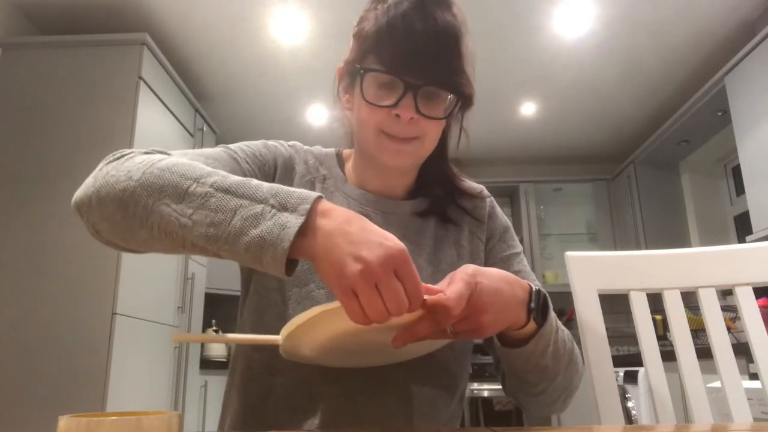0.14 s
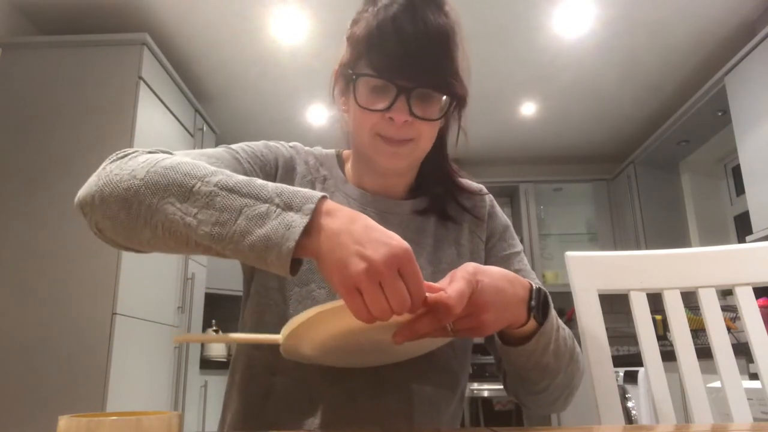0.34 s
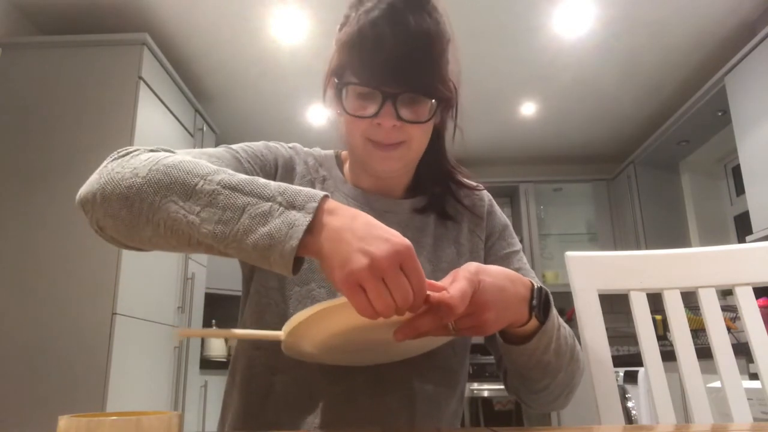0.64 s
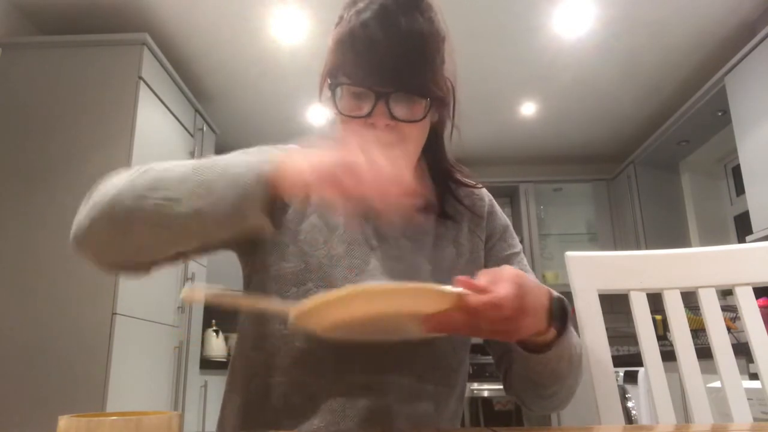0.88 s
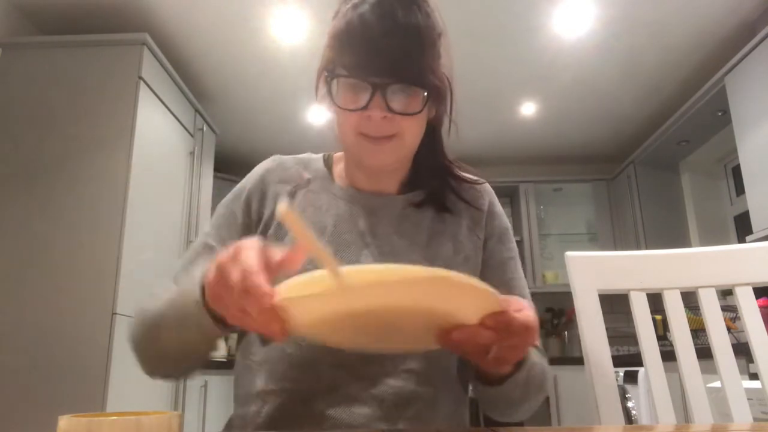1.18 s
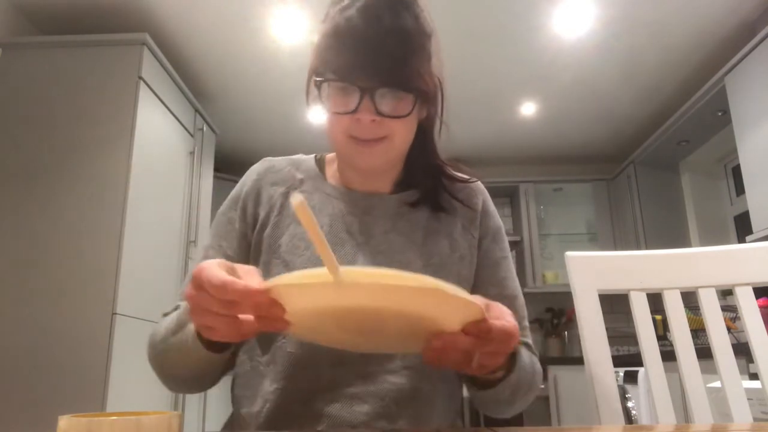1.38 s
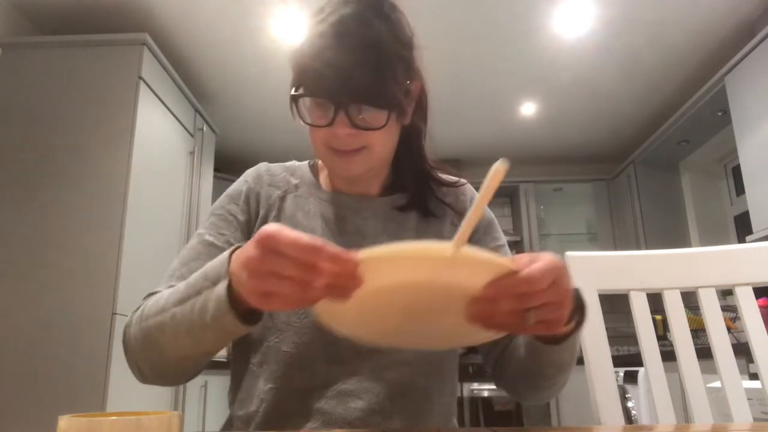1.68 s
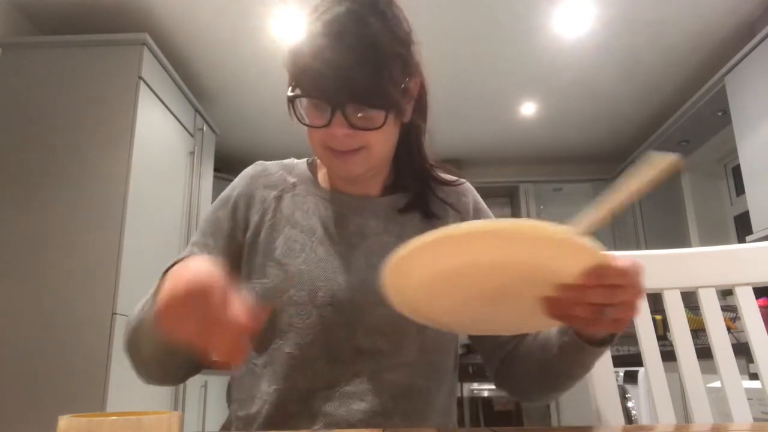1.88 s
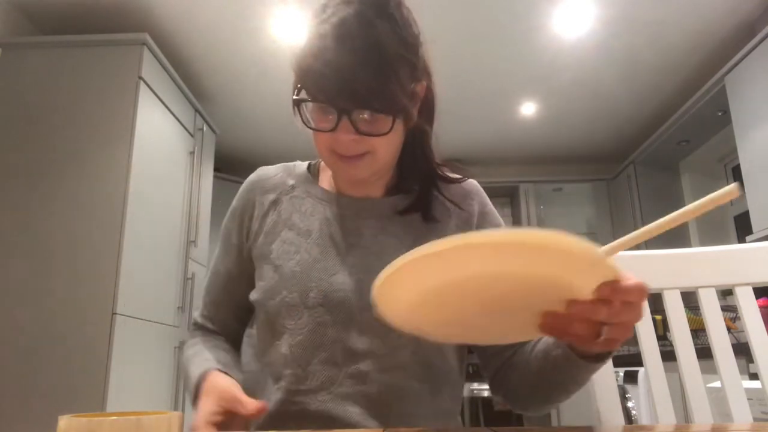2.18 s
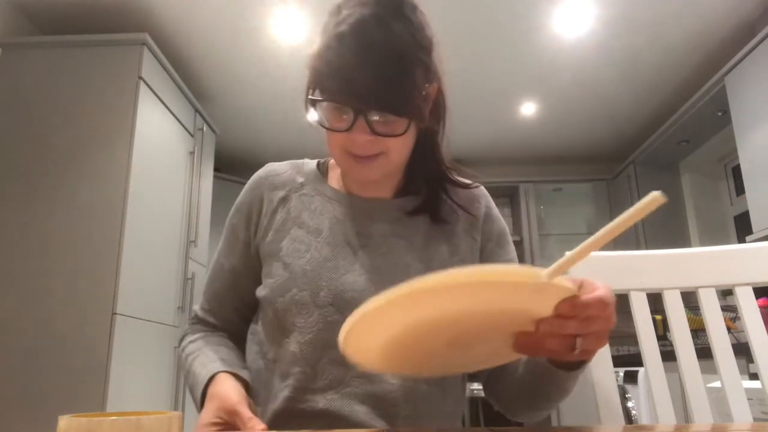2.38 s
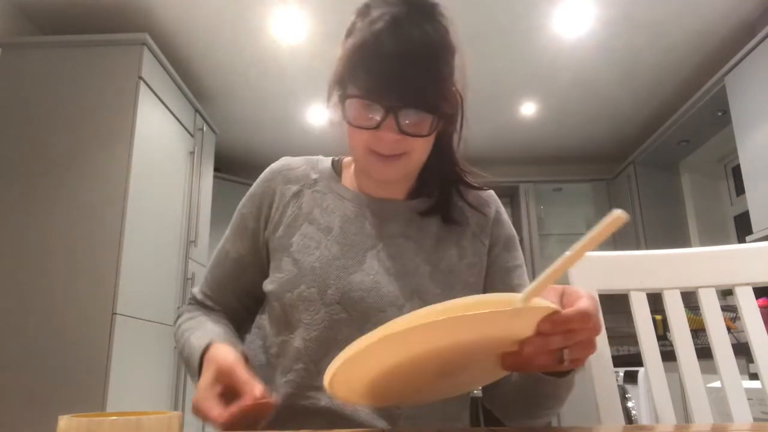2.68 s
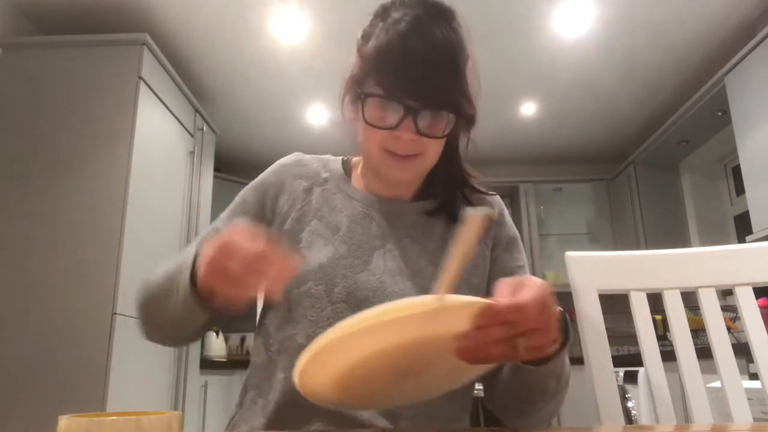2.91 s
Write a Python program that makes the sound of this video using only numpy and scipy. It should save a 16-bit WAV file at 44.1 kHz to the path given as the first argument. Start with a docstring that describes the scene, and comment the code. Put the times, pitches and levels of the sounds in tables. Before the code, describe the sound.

A paper plate clicks and buckles as fingers press tape onto it, then rub round the rim with one short squeak. After a lull, sticky tape rips off in a quick burst, close up in an echoing kitchen.

```python
"""Taping a paper plate

A paper plate with a stick taped to it is handled close up at a kitchen table. Fingers press tape on,
so the card clicks, buckles and bumps, then slide round the rim with one short squeak. A strip of
sticky tape rips off in one quick run of snaps. The hard kitchen rings and hums faintly."""
import sys
import numpy as np
from scipy import signal
from scipy.fft import rfft, irfft, dct, next_fast_len
from scipy.io import wavfile
from scipy.ndimage import map_coordinates

SR = 44100
rng = np.random.default_rng(int(sys.argv[2]) if len(sys.argv) > 2 else 0)


def int16_out(signal):
    """Quantize to a 16-bit WAV file."""
    q = np.round(np.clip(np.atleast_2d(signal).T, -1, 1) * 32767)
    wavfile.write(sys.argv[1], SR, q.astype(np.int16))


N = 134505
TIME = np.arange(N) / SR


def plate_clicks():
    """The card buckles or is tapped: each click has its own pitch and balance of thump and tick."""
    # buckles: t/s, level/dB, bass/dB, treble/dB, base ring time/s, pitch of the flexing patch/Hz
    clicks = [(.132, -32, -4, 16, 0.025, 2210), (.146, -30.5, -13, 25, 0.0059, 4000),
              (.152, -21.5, 17, 10, 0.013, 3740), (0.1601, -19.5, 2, 4, 0.014, 1120),
              (.173, -18.5, 1.5, -5, 0.015, 597), (0.2185, -19, 11, 1, 0.017, 1390),
              (0.2306, -20, -22, 13.5, 0.0061, 6700), (.411, -30, 10.5, 9.5, .014, 450),
              (0.4642, -18.5, 3.5, 7.5, 0.0077, 470), (.470, -21, 14, 11, 0.011, 6340),
              (0.5079, -20, -6, -9, 0.0086, 3900), (0.526, -25.5, 2, 7, .022, 5930),
              (0.5292, -22, 7, 8.5, 0.027, 600), (.724, -16.5, -11.5, 0, 0.0049, 3600),
              (0.7264, -12.5, 6.5, -1, 0.016, 1680), (0.9377, -18.5, -12.5, -6.5, 0.018, 1030),
              (1.0918, -20.5, 5.5, -6, 0.038, 810), (1.098, -17, 1, -4.5, 0.03, 817),
              (1.136, -26, 9, -6, 0.05, 790), (1.196, -24.5, -5, -6, 0.036, 1170),
              (1.213, -16.5, -21, -15, 0.023, 1370), (1.222, -19.5, 10, -6, 0.034, 402),
              (1.2553, -21.5, -7, -6, 0.019, 1970), (1.371, -27, 1, -4, 0.03, 1199),
              (1.39, -29, 7, 8, 0.023, 380), (2.271, -38, -15, 3, 0.026, 5920),
              (2.9572, -29, -5, 3.5, 0.15, 1110), (3.042, -30, 0, 3, .025, 1150)]
    # tone of the card: f/Hz, level/dB
    card_tone = [(40, -24), (150, -18), (250, -1.5), (350, 2.5), (700, -1), (950, 2), (1220, 3.5),
                 (1430, -1.5), (1750, 1.5), (2500, -6.5), (3050, -4.5), (3550, -2.5), (4900, -9.5),
                 (6200, -8), (10000, -19), (15500, -23.5)]
    out = np.zeros(N)
    for at, db, bass_db, treble_db, ring_s, patch_hz in clicks:
        plate = lambda hz: along(card_tone, hz) + shelves(hz, bass_db, treble_db)
        click = sheet_snap(ring_s, crack=0.55, colour=lambda hz: plate(hz) + flex_peak(hz, patch_hz))
        add(out, at, amp(db) * click)
        # the room gets the smooth tone of the whole plate
        add(out, at, amp(db) * kitchen_ring(struck(np.ones(1), plate), room_db=-2))
    return out


def tape_rip():
    """Thin snaps crowd together and drop in pitch; fine crackle fills in as the strip tears free."""
    # the tape lets go: t/s, level/dB, bass/dB, treble/dB, base ring time/s
    snaps = [(2.466, -33, -6, 4, 0.018), (2.493, -12.5, 3, 7.5, 0.01), (2.5133, -24, -10, 8, 0.0098),
             (2.5208, -12.5, -18, 0, 0.013), (2.5224, -7, -15, -4, 0.017), (2.5321, -11, -5, 0, 0.019),
             (2.5424, -18.5, -10, -10, 0.0077), (2.546, -12, -22, -7, 0.012), (2.5496, -9, 2.5, 2, 0.0092),
             (2.559, -7, -10, -4, 0.0072), (2.5633, -7, -4.5, -2.5, 0.03), (2.572, -2.5, -14.5, 9, 0.0045),
             (2.5783, -6, -0.5, 1.5, 0.013), (2.5803, -8.5, 5, 1, 0.013), (2.588, -7.5, 0, 3.5, 0.024),
             (2.5918, -7.5, -1.5, 7, 0.012), (2.5954, -7.5, -7.5, 0.5, 0.0098),
             (2.6002, -10, -12, 7, 0.006)]
    # tone of the tape: f/Hz, level/dB
    tape_tone = [(95, -26), (200, -9.5), (300, -6.5), (420, -5.5), (600, -.5), (1170, -2.5), (1500, -1.5),
                 (2000, -7), (2550, 0.5), (3500, -1.5), (6000, 0.5), (9000, -2.5), (11500, -5),
                 (14000, -3.5), (15700, -8)]
    # the strip rings lower as it lengthens: t/s, f/Hz
    strip_pitch = [(2.493, 1350), (2.522, 1123)]
    out, room_db = np.zeros(N), -1.5
    for at, db, bass_db, treble_db, ring_s in snaps:
        strip_hz = np.interp(at, *np.transpose(strip_pitch))
        colour = lambda hz: (along(tape_tone, hz) + shelves(hz, bass_db, treble_db)
                             + flex_peak(hz, strip_hz))
        snap = sheet_snap(ring_s, crack=0.64, colour=colour)
        add(out, at, amp(db) * in_kitchen(snap, room_db))
    long_strip = lambda hz: along(tape_tone, hz) + flex_peak(hz, strip_pitch[-1][1])
    tear = friction(0.017, long_strip, rise_s=0.003, fall_s=0.003, grain_db=4.5)
    add(out, at=2.58, x=amp(-38) * in_kitchen(tear, room_db))
    return out


def plate_bumps():
    """Soft contacts set the whole plate swinging in a short, uneven low tone."""
    # the plate is bumped or jerked: t/s, level/dB, f/Hz
    bumps = [(0.229, -35, 242), (.535, -27, 140), (1.098, -29, 181.4), (1.137, -29.5, 109),
             (1.208, -24.5, 92), (1.223, -28.5, 167), (2.575, -27.5, 64), (2.587, -18, 165.2),
             (2.582, -18, 310)]
    attack_s, t60 = 0.00083, 0.17
    out, t = np.zeros(N), TIME[:SR // 4]
    envelope = (1 - np.exp(-t / attack_s)) * amp(-60 * t / t60)
    for at, db, hz in bumps:
        swing = envelope * np.sin(2 * np.pi * hz * t + 0.6 * wobble(hz, len(t)))
        add(out, at, amp(db) * in_kitchen(swing / np.linalg.norm(swing), room_db=-7.5))
    return out


def finger_slides():
    """Skin scratches over the card with slightly uneven pressure, and catches once."""
    # strokes: start/s, end/s, level/dB, treble/dB
    slides = [(0, 0.044, -65.5, 4), (0.046, 0.327, -66.5, -7), (0.402, 0.59, -65, -3),
              (0.676, 0.735, -55.5, -6), (0.768, 0.818, -60, -9), (1.035, 1.12, -57.5, 7),
              (1.119, 1.26, -58, -7), (1.278, 1.38, -54.5, -8), (1.442, 1.518, -52, 3),
              (1.51, 1.582, -46.5, 4), (1.581, 1.659, -55.5, -3.5), (1.871, 1.995, -63.5, 3.5),
              (2.101, 2.259, -68, 3)]
    # tone of skin on card: f/Hz, level/dB
    rub_tone = [(60, -11), (350, -5), (750, -6), (1150, 5), (1700, -0.5), (2200, -4.5), (3100, -4),
                (4400, -2.5), (5100, -8), (6200, -5), (8000, -12), (15500, -18.5)]
    out = np.zeros(N)
    for start, end, db, treble_db in slides:
        colour = lambda hz: along(rub_tone, hz) + shelves(hz, 0, treble_db)
        rub = friction(end - start, colour, rise_s=0.011, fall_s=0.012, grain_db=2)
        add(out, start, amp(db) * rub)
    add(out, at=1.51, x=amp(-41) * finger_squeak())
    pressure = amp(0.95 * wobble(90, N))
    return in_kitchen(out * pressure, room_db=-4.5)[:N]


def finger_squeak(pitch_hz=1610, rise_s=0.0017, t60=0.14):
    """A finger catches and the card sings one brief, rough note."""
    t = TIME[:SR // 4]
    tone = np.sin(2 * np.pi * pitch_hz * t + wobble(260, len(t)))
    return tone * np.clip(t / rise_s, 0, 1) * amp(-60 * t / t60)


def sheet_snap(ring_s, crack, colour):
    """A sharp release and the short, dense ring of a thin sheet."""
    # lows hang on longest: f/Hz, t60 as a multiple of the base ring time
    ring_stretch = [(200, 2.3), (1500, 1.57), (5000, 1.65), (14000, 1.06)]
    ring = dying_noise(lambda hz: ring_s * along(ring_stretch, hz), count=2048, block=16)
    ring[0] += crack
    return struck(ring, colour)


def flex_peak(hz, centre_hz, peak_db=9, half_width_octaves=0.21):
    """Resonance of a flexing patch of card or tape, in dB."""
    return peak_db / (1 + (np.log2((hz + 1) / centre_hz) / half_width_octaves) ** 2)


def friction(length_s, colour, rise_s, fall_s, grain_db, slips_per_s=1100):
    """Grainy stick-slip noise with attack, hold and release; colour is in dB."""
    t = TIME[:int((length_s + 10 * fall_s) * SR)]
    slips = rng.standard_normal(len(t)) * amp(grain_db * wobble(slips_per_s, len(t)))
    envelope = np.clip(t / rise_s, 0, 1) * np.exp(-np.maximum(t - length_s, 0) / fall_s)
    return envelope * unit(filtered(slips, lambda hz: amp(colour(hz))))


def kitchen_ring(x, room_db, wall_delay_s=0.0021, build_s=0.0022):
    """Reverb alone: the hard walls answer x with a dense tail."""
    # decay of the room: f/Hz, t60/s
    decay = [(150, 0.5), (500, 0.5), (1300, 0.63), (3700, 0.62), (7000, 0.53), (10000, 0.4), (15000, 0.24)]
    # tone of the tail: f/Hz, level/dB
    tail_tone = [(100, 8.5), (500, 4), (1150, 4), (2000, 3), (4200, -0.5), (10000, 3), (15000, 11.5)]
    tail = dying_noise(lambda hz: along(decay, hz), count=SR // 2, block=128,
                       colour=lambda hz: along(tail_tone, hz))
    tail *= amp(room_db) * np.clip((TIME[:len(tail)] - wall_delay_s) / build_s, 0, 1)
    return signal.fftconvolve(x, tail)


def in_kitchen(x, room_db):
    """The direct sound plus the ring of the room."""
    out = kitchen_ring(x, room_db)
    add(out, 0, x)
    return out


def room_tone(hum_hz=308, half_width_hz=44):
    """Steady rumble and hiss, with a hum of narrow-band noise that swells and fades."""
    # kitchen air: f/Hz, level/dB
    air_tone = [(15, -45), (30, -12.5), (50, 0), (100, .5), (140, -3.5), (220, -6), (320, -8), (450, -11),
                (1200, -13.5), (2200, -21.5), (6000, -26.5), (10000, -31.5), (15500, -34)]
    # swell of the hum: t/s, level/dB
    swell = [(1.6, -71.5), (2.0, -63.5), (2.6, -70.5), (3.05, -86)]
    air = unit(filtered(rng.standard_normal(N), lambda hz: amp(along(air_tone, hz))))
    hum_band = lambda hz: 1 / (1 + ((hz - hum_hz) / half_width_hz) ** 4)
    hum = unit(filtered(rng.standard_normal(N), hum_band))
    return amp(-63) * air + amp(np.interp(TIME, *np.transpose(swell))) * hum


def dying_noise(t60, count, block, colour=lambda hz: 0):
    """Noise of energy 1 in which each frequency dies at its own speed."""
    hz = (np.arange(block) + .5) * SR / (2 * block)
    t = np.arange(0, count, block)[:, None] / SR
    gain = amp(colour(hz) - 60 * t / np.maximum(t60(hz), 1e-3))
    noise = dct(gain * rng.standard_normal(gain.shape), type=4, norm="ortho").ravel()
    return noise / np.linalg.norm(noise)


def struck(x, colour, size=4096):
    """x through a causal filter given in dB, at energy 1."""
    cepstrum = irfft(colour(np.fft.rfftfreq(size, 1 / SR)) * np.log(10) / 20)
    cepstrum[1:size // 2] *= 2  # minimum phase keeps the attack sharp
    cepstrum[size // 2 + 1:] = 0
    hit = signal.fftconvolve(x, irfft(np.exp(rfft(cepstrum))))
    return hit / np.linalg.norm(hit)


def shelves(hz, bass_db, treble_db, bass_hz=790, treble_hz=4000):
    """Gain in dB of a bass shelf and a treble shelf."""
    return bass_db / (1 + (hz / bass_hz) ** 2) + treble_db / (1 + (treble_hz / (hz + 1)) ** 2)


def filtered(x, response):
    """x shaped by a gain for each frequency."""
    size = next_fast_len(len(x) + SR // 4)
    return irfft(rfft(x, size) * response(np.fft.rfftfreq(size, 1 / SR)), size)[:len(x)]


def wobble(rate, count):
    """A smooth random curve, rate knots a second."""
    knots = rng.standard_normal(int(count * rate / SR) + 4)
    return map_coordinates(knots, [TIME[:count] * rate])


def along(points, hz):
    """(f/Hz, value) points read on a log frequency axis."""
    freqs, values = np.transpose(points)
    return np.interp(np.log(hz + 1), np.log(freqs + 1), values)


def amp(db):
    """Decibels to gain."""
    return 10 ** (np.asarray(db) / 20)


def unit(x):
    """x at rms 1."""
    return x / np.sqrt(np.mean(x ** 2) + 1e-20)


def add(track, at, x):
    """Mix x into the track, starting at a time in seconds."""
    part = track[max(round(at * SR), 0):][:len(x)]
    part += x[:len(part)]


def scene():
    """Plate, fingers, tape and kitchen in one mono mix."""
    return (plate_clicks() + plate_bumps() + finger_slides() + tape_rip() + room_tone())[None]


def record(dry):
    """A steep high cut takes off the very top."""
    top_hz, edge_hz = 16200, 500
    return np.array([filtered(x, lambda hz: np.clip((top_hz - hz) / edge_hz, 0, 1)) for x in dry])


dry = scene()
out = record(dry)
int16_out(out)
```